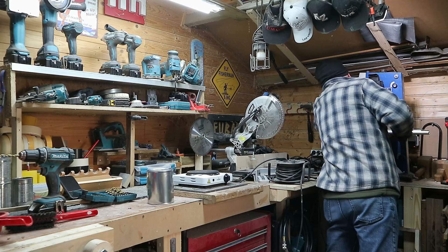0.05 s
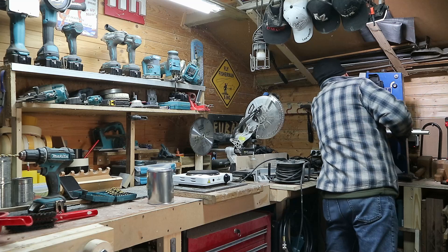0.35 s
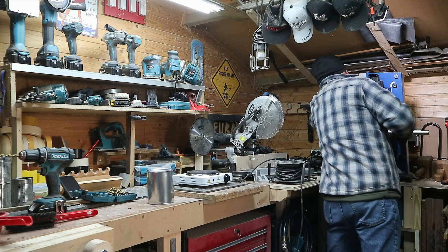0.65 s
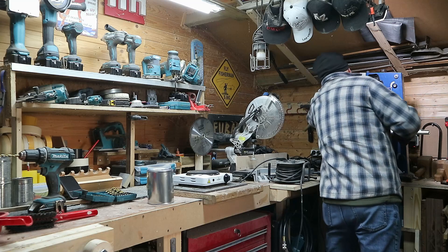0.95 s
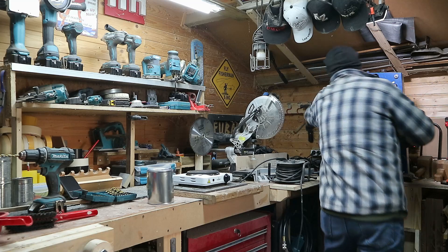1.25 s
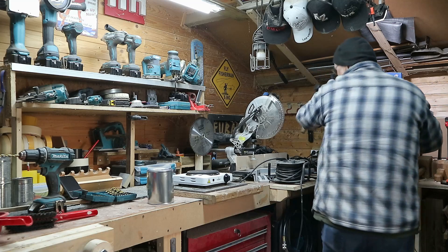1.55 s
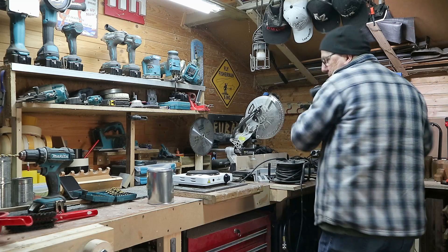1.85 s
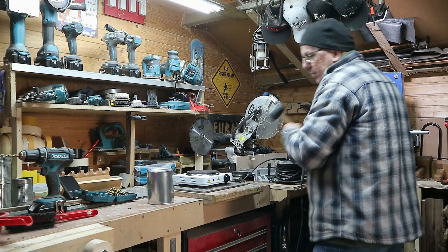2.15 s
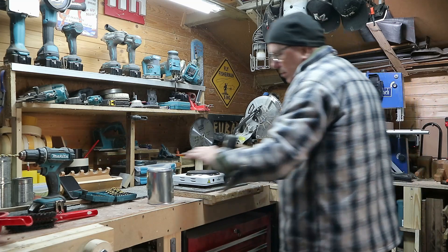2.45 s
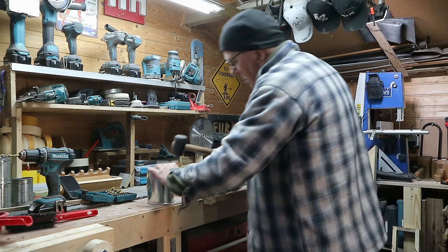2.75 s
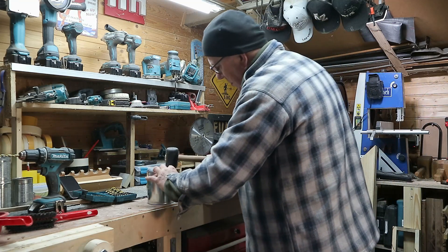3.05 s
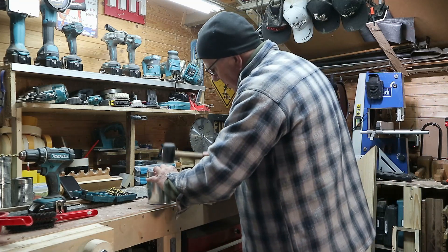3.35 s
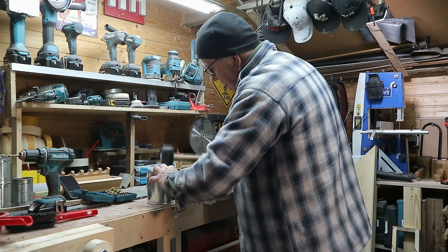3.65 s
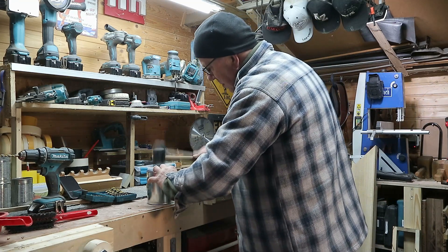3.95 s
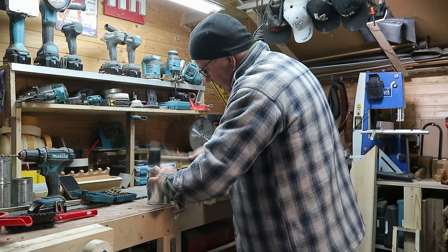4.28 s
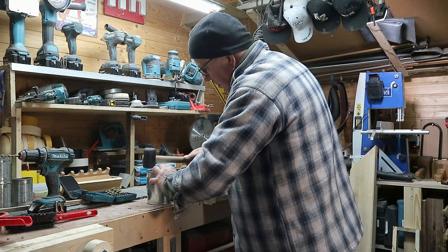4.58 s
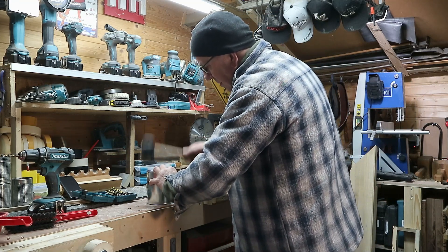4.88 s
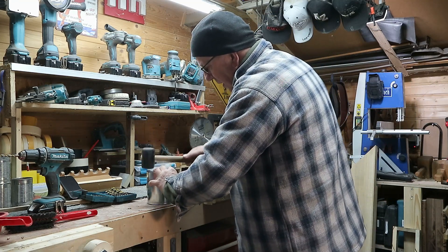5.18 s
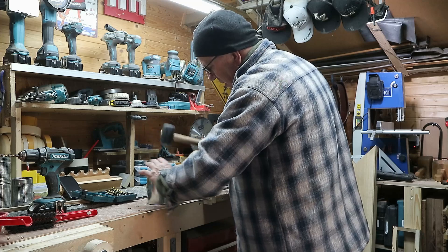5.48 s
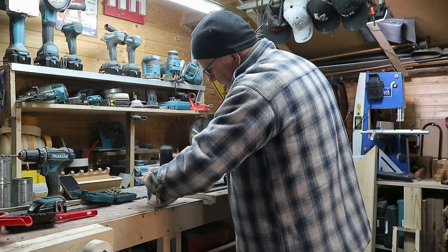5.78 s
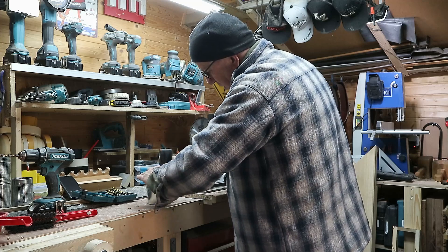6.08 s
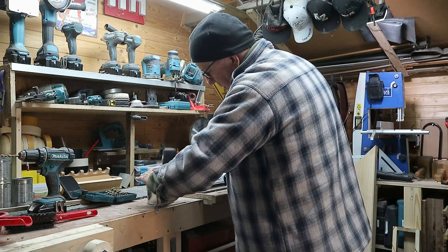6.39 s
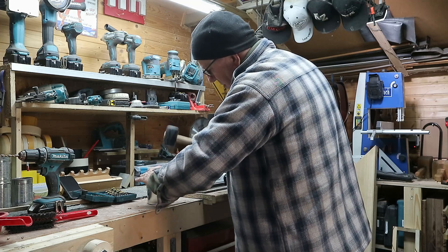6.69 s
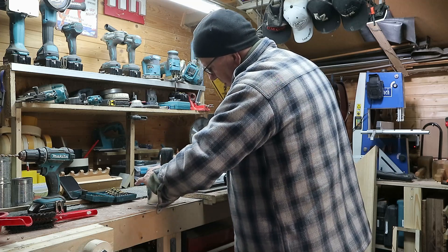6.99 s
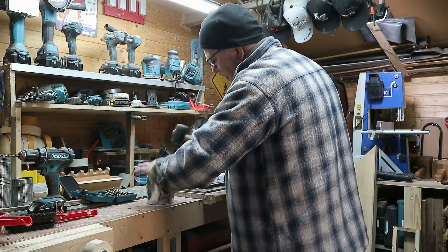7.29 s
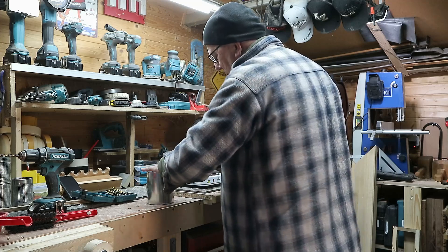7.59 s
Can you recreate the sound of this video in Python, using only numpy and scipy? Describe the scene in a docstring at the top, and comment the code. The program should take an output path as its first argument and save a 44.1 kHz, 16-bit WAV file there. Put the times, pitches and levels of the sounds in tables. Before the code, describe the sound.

In a small, cluttered workshop, tools knock together with a couple of sharp steel clanks and dull thuds. A jacket swishes briefly. A mallet then taps the lid of a sand-filled paint can and strikes it eleven times, in a quick run of seven and another of four. Each blow is a short tinny clack over a workbench thump, with a brief rattle. The echoes are tight, and the loudest peaks overload the microphone.

```python
"""Tools clank in a small, cluttered wooden workshop as someone takes a mallet and turns with a swish of
the jacket. Eleven quick blows, with a few light touches, drive home the lid of a sand-filled paint can.
Each impact excites the modes of the can and a bending wave in the bench. The sand damps the can heavily,
so a blow is a short tinny clack over a thump, with the crack of the rim and a brief rattle.
The room adds dense, short echoes, and the loudest peaks overload the microphone."""
import sys
import numpy as np
from scipy import signal
from scipy.fft import rfft, irfft
from scipy.io import wavfile

SR = 44100
rng = np.random.default_rng(int(sys.argv[2]) if len(sys.argv) > 2 else 0)


def store_wav(level_fs):
    """Save 16-bit WAV to argv[1]."""
    pcm = np.round(np.clip(np.atleast_2d(level_fs), -1, 1) * 32767)
    wavfile.write(sys.argv[1], SR, pcm.T.astype(np.int16))


N = 340893
TIME, EVENT_TIME = np.arange(N) / SR, np.arange(SR // 4) / SR   # time axes of the scene and one event, s

# spectra of the still air and of the low background noise: frequency_hz, density_db
AIR_SPECTRUM = [(25, -14), (50, -2.5), (80, 4), (170, 4.5), (370, 3.5), (700, -2), (1200, -12),
                (2800, -24.5), (5000, -29.5), (15000, -61.5)]
LOW_NOISE_SPECTRUM = [(25, -18.5), (55, -3.5), (75, 4.5), (110, -10.5), (800, -84.5)]
# the recorder turns the low background noise down once the blows begin: time_s, level_db
LOW_NOISE_GAIN = [(0, -61.5), (3.3, -61.5), (4.2, -77.5)]
# spectra of the room's echoes and of the hum of shelves and saw blades: frequency_hz, gain_db
ROOM_SPECTRUM = [(60, -4.5), (150, -2.5), (210, -1), (330, -1), (520, -4.5), (900, -2.5), (1500, -4),
                 (2500, -7), (5000, -8.5), (8000, -5), (13000, -12)]
HUM_SPECTRUM = [(100, -62), (200, -51), (400, -36), (700, -43), (1400, -52), (3000, -74)]
# reverberation time: frequency_hz, t60_s
ROOM_DECAY = [(100, .3), (250, .24), (700, .23), (2000, .215), (5000, .185), (12000, .16)]
# left-right likeness of the diffuse field: frequency_hz, correlation
COHERENCE = [(80, 1), (200, 0.12), (500, 0.36), (1000, 0), (2500, 0)]

# steady rustle of clothes: time_s, level_db
RUSTLE_ENVELOPE = [(0.0, -59.5), (0.7, -60), (1.27, -49.5), (1.72, -60.5), (2.38, -61), (2.93, -58.5),
                   (3.19, -67), (3.4, -70.5)]
# sleeve brushing the jacket: start_s, length_s, level_db, hollow_db
SLEEVE_STROKES = [(1.926, 0.094, -34.5, 3.5), (2.363, .013, -46.5, -22), (2.583, 0.2, -48.5, -22.5),
                  (2.734, 0.052, -38.5, -10.5), (2.869, .12, -37, -3.5), (7.281, .17, -60, -28)]
# spectra of sliding cloth and of its hollow resonance: frequency_hz, density_db
CLOTH_SPECTRUM = [(100, -18), (300, -3), (600, -2.5), (1100, -3), (2100, -4), (3000, -8), (5000, -9.5),
                  (9500, -22), (12000, -36), (15000, -59.5)]
HOLLOW_SPECTRUM = [(40, -60), (600, -26), (750, -10), (818, 4), (890, -9), (1050, -9), (1150, -1),
                   (1280, -14), (1500, -8), (1750, -19), (2140, -10), (2600, -22), (9000, -70)]

# tools knocking together: start_s, level_db, tilt_db_per_octave, pitch_hz
TOOL_KNOCKS = [(.092, -30, -2, 459), (0.16, -35.5, 3, 1074), (.222, -29.5, 3.5, 1913),
               (0.259, -39.5, -2, 360), (0.479, -32.5, -5, 549), (0.55, -35.5, -1, 1094),
               (.659, -45.5, -5, 416), (0.784, -16, -2, 422), (0.831, -12.5, 5.5, 2844),
               (1.05, -37, 1.5, 2330), (1.101, -1, 4.5, 1522), (1.105, -4, 3, 1690), (1.369, -19, 1, 830),
               (1.505, -37, 5.5, 2300), (1.646, -39, -1, 800)]
# modes of a struck steel tool and of a jogged hanging one: pitch_hz, level_db, t60_s
STEEL_MODES = [(592, -6, .17), (1739, -9, .16), (2318, 2, .21), (2370, -3, .13), (3165, -17, .18),
               (3962, -16, .11)]
HANGING_TOOL_MODES = [(921, -34.5, .55), (1206, -45, .6), (1416, -42, .6)]
# feet and things set down: start_s, level_db
FLOOR_THUDS = [(0.55, -49.5), (0.786, -23.5), (0.833, -34.5), (1.1, -33), (1.285, -46.5), (1.374, -43.5)]
# spectra of a knock and of a thud: frequency_hz, density_db
KNOCK_SPECTRUM = [(50, -14.5), (140, -12), (250, -3), (420, 2.5), (800, 1), (1200, -5.5), (1700, 0),
                  (2800, -10.5), (4300, -13), (7000, -25.5), (11000, -42.5), (15000, -51.5)]
THUD_SPECTRUM = [(40, -30), (92, -5), (135, -28.5), (190, -7), (260, -4), (450, -11), (3000, -85.5)]

# light touches: the mallet taps the lid, then the can is turned and let go: start_s, level_db
LIGHT_TOUCHES = [(3.097, -26.5), (5.699, -50.5), (5.834, -30), (7.648, -51)]
# spectra of shaken sand and tools and of the rim biting into its groove: frequency_hz, density_db
RATTLE_SPECTRUM = [(50, -27), (125, -19), (185, -2), (270, -2.5), (400, 1), (620, 5), (1000, 4),
                   (1900, -1.5), (2800, -17.5), (4200, -17), (6000, -29), (15000, -70)]
RIM_SPECTRUM = [(40, -20), (300, -14.5), (800, -1.5), (1200, 0.5), (2000, 3.5), (2800, -7), (4200, -8),
                (5500, -19.5), (8000, -24.5), (15000, -56)]
# mallet on the lid: start_s, force_db, spot (0 centre, 1 rim), sink (lid travel, 0 to 1),
# body_db, wall_db, lid_db, body_hz, wall_hz, lid_hz
MALLET_BLOWS = [(3.4155, -2, 0.87, .45, -1.5, -11.5, -21, 536, 750, 1685),
                (3.7519, -2, 0.62, 0.72, -0.5, -4, 0.5, 483, 854, 1850),
                (4.0806, -1.5, .3, 0.46, 3, 1, .5, 530, 736, 1524),
                (4.398, -3, 0.33, 0.56, 5.5, 2, -3, 537, 780, 1480),
                (4.6828, -4.5, .25, 0.47, 2.5, -1, -0.5, 516, 780, 1550),
                (5.0155, -4, .15, 0.37, 6.5, -4.5, -5.5, 512, 880, 1680),
                (5.277, -3.5, .03, .45, 4.5, -6.5, -0.5, 539.3, 880, 1660),
                (6.1371, 3, .95, 0.1, 0, -2, -12, 419, 860, 1664),
                (6.4851, -1, .55, 0.41, -2.5, -2.5, -2, 382, 760, 1900),
                (6.8708, -5, 0.72, .33, 1, 4, 1.5, 570, 844, 1915),
                (7.092, -3, 0.95, 0, -3, 1.5, -6.5, 542, 818, 1940)]
# response of each part, the stiff lid first and the heavy bench last: level_db, rise_s, delay_s
LID_RESPONSE = (0, .0007, .0008)
WALL_RESPONSE = (0, .0012, .0034)
BODY_RESPONSE = (0, .0012, .0042)
BENCH_RESPONSE = (-17.5, .0075, .005)
# glide of the bending wave: first_hz, last_hz
BENCH_GLIDE = (720, 170)
# a blow at the rim runs down the wall into the bench: centre_db, rim_db
BENCH_COUPLING = (-2, 7.5)
# weaker modes of can and bench top: pitch_hz, level_db, rise_s
WEAK_MODES = [(93, -43, .016), (183, -26.5, .012), (234, -28, .01), (365, -21, .007), (545, -22, .007),
              (885, -23, .004), (1250, -13, .002), (1452, -15, .0026), (2100, -10, .0007),
              (2700, -19, .0007), (3900, -20, .0009)]


def from_db(db):
    """Amplitude grows tenfold every 20 dB."""
    return 10 ** (np.asarray(db) / 20)


def unit_power(x):
    """Division by the RMS value gives unit power."""
    return x / np.sqrt(np.mean(x ** 2) + 1e-20)


def at_hz(points, hz):
    """Interpolation on a logarithmic frequency axis."""
    frequency_hz, value = np.transpose(points)
    return np.interp(np.log(np.maximum(hz, 1)), np.log(frequency_hz), value)


def add(track, start_s, sound):
    """Superposition: a sound adds to the track from start_s on."""
    start = max(int(start_s * SR), 0)
    track[..., start:start + sound.shape[-1]] += sound[..., :N - start]


def noise(spectrum, size=len(EVENT_TIME), tilt_db=0):
    """Random phases turn a spectrum, tilted by tilt_db per octave, into noise of unit power."""
    hz = np.fft.rfftfreq(size, 1 / SR)
    level_db = at_hz(spectrum, hz) + tilt_db * np.log2(np.maximum(hz, 200) / 1000)
    return unit_power(irfft(from_db(level_db) * np.exp(2j * np.pi * rng.random(len(hz))), size))


def diffuse(left, right):
    """A diffuse field is coherent in the bass and incoherent in the treble."""
    coherence = np.clip(at_hz(COHERENCE, np.fft.rfftfreq(len(left), 1 / SR)), -.99, .99)
    mid, side = rfft([left, right]) * np.sqrt([(1 + coherence) / 2, (1 - coherence) / 2])
    return irfft([mid + side, mid - side], len(left))


def place(x, pan_db, lag_s):
    """Level and arrival time give direction: the right channel is pan_db weaker and lag_s later."""
    return np.array([x * from_db(pan_db / 2), np.interp(TIME - lag_s, TIME, x) * from_db(-pan_db / 2)])


def swell(rise_s, delay_s=0):
    """Vibration spreads through a part, peaks at 1 twice rise_s after the delay, and is damped."""
    age = np.maximum(EVENT_TIME - delay_s, 0) / (2 * rise_s)
    return (age * np.exp(1 - age)) ** 2


def sine(hz):
    """Simple harmonic motion with a random phase."""
    return np.sin(2 * np.pi * (hz * EVENT_TIME + rng.random()))


def background():
    """Ambient noise: a diffuse field of quiet air, and low noise that the recorder turns down."""
    air = from_db(-61) * diffuse(noise(AIR_SPECTRUM, N), noise(AIR_SPECTRUM, N))
    low_noise = from_db(np.interp(TIME, *np.transpose(LOW_NOISE_GAIN))) * noise(LOW_NOISE_SPECTRUM, N)
    return air + low_noise


def reverberation(x, first_echo_s=.0019, build_s=.0041, hum_t60_s=2.3):
    """Echoes scattered by the clutter decay exponentially band by band; a resonant hum outlasts them."""
    t, hz = np.arange(SR) / SR, np.fft.rfftfreq(SR, 1 / SR)
    edges_hz = np.geomspace(30, 18000, 15)
    white, echoes = rfft(rng.standard_normal((2, SR))), 0
    onset = 1 - np.exp(-np.maximum(t - first_echo_s, 0) / build_s)
    coloured = white * from_db(at_hz(ROOM_SPECTRUM, hz))
    for low, high in zip(edges_hz, edges_hz[1:]):
        fade = unit_power(onset * from_db(-60 * t / at_hz(ROOM_DECAY, np.sqrt(low * high))))
        echoes = echoes + irfft(coloured * ((hz >= low) & (hz < high)), SR) * fade
    hum_fade = unit_power(onset * from_db(-60 * t / hum_t60_s))
    hum = irfft(white * from_db(at_hz(HUM_SPECTRUM, hz)), SR) * hum_fade
    return signal.fftconvolve(x[None], diffuse(*(echoes + hum)) / np.sqrt(SR), axes=1)


def shifting_echoes(x):
    """Reflection paths change as the person moves, so each blow meets another impulse response."""
    out, starts = np.zeros((2, N)), [0] + [blow[0] for blow in MALLET_BLOWS]
    for start_s, end_s in zip(starts, starts[1:] + [N / SR]):
        add(out, start_s, reverberation(x[int(start_s * SR):int(end_s * SR)]))
    return out


def jacket(grip_s=.0096, release_s=.0086, rustle_gain_db=4):
    """Sliding friction of cloth makes short swishes, over a rustle that drops as the person stills."""
    rustle_db = np.interp(TIME, *np.transpose(RUSTLE_ENVELOPE), right=-74) + rustle_gain_db
    out = from_db(rustle_db) * noise(CLOTH_SPECTRUM, N)
    for start_s, length_s, level_db, hollow_db in SLEEVE_STROKES:
        grip = 1 - np.exp(-EVENT_TIME / grip_s)
        release = np.exp(-np.maximum(EVENT_TIME - length_s, 0) / release_s)
        friction = noise(CLOTH_SPECTRUM) + from_db(hollow_db) * noise(HOLLOW_SPECTRUM)
        add(out, start_s, from_db(level_db) * grip * release * friction)
    return out


def tools(contact_s=.0026, firm_fade_s=.0069, note_db=-5, ring_db=-20.5, jog_s=.835):
    """Impacts of wood and steel excite free vibration; a jogged tool sings on, and the floor thuds."""
    out, onset = np.zeros(N), 1 - np.exp(-EVENT_TIME / contact_s)
    for start_s, level_db, tilt_db, pitch_hz in TOOL_KNOCKS:
        fade_s = firm_fade_s * 2 ** (-level_db / 25)   # a knock 25 dB lighter lasts twice as long
        note = from_db(note_db) * np.sin(2 * np.pi * pitch_hz * EVENT_TIME)
        clatter = (noise(KNOCK_SPECTRUM, tilt_db=tilt_db) + note) * np.exp(-EVENT_TIME / fade_s)
        # bright knocks wake the high modes of the steel, dull ones the low
        ring = sum(from_db(db + 1.3 * tilt_db * np.log2(hz / 1500) - 60 * EVENT_TIME / t60_s) * sine(hz)
                   for hz, db, t60_s in STEEL_MODES)
        add(out, start_s, from_db(level_db) * (clatter + from_db(ring_db) * ring) * onset)
    for pitch_hz, level_db, t60_s in HANGING_TOOL_MODES:
        add(out, jog_s, from_db(level_db - 60 * TIME / t60_s) * np.sin(2 * np.pi * pitch_hz * TIME))
    for start_s, level_db in FLOOR_THUDS:
        add(out, start_s, from_db(level_db) * swell(rise_s=.011) * noise(THUD_SPECTRUM))
    return out


def bending_wave(glide_s=.0115, round_trip_s=.021, round_trip_db=-9.5):
    """Dispersion: short waves outrun long ones, so the bench's thump sinks; the far end reflects it."""
    first_hz, last_hz = BENCH_GLIDE
    level_db, rise_s, delay_s = BENCH_RESPONSE
    out = 0
    for trip in range(3):
        start_s = delay_s + trip * round_trip_s
        hz = last_hz + (first_hz - last_hz) * np.exp(-np.maximum(EVENT_TIME - start_s, 0) / glide_s)
        wave = np.sin(2 * np.pi * (np.cumsum(hz) / SR + rng.random()))
        out = out + from_db(level_db + trip * round_trip_db) * swell(rise_s, start_s) * wave
    return out


def light_touches(rise_s=.003, fade_s=.017, bench_db=7):
    """Light contact, a mallet tap or a move of the can, excites brief noise and a soft bending wave."""
    out, envelope = np.zeros(N), (1 - np.exp(-EVENT_TIME / rise_s)) * np.exp(-EVENT_TIME / fade_s)
    for start_s, level_db in LIGHT_TOUCHES:
        contact = envelope * noise(RATTLE_SPECTRUM, tilt_db=2.5)
        add(out, start_s, from_db(level_db) * (contact + from_db(bench_db) * bending_wave()))
    return out


def rattle(level_db=-9, rise_s=.0027, fade_s=.031, spot_db=6, grain_db=3, grain_s=.0014):
    """Forced vibration shakes the sand and loose tools briefly, most after a blow near the rim."""
    out, shake = np.zeros((2, N)), (1 - np.exp(-EVENT_TIME / rise_s)) * np.exp(-EVENT_TIME / fade_s)
    grain_starts = np.arange(0, EVENT_TIME[-1], grain_s)
    for start_s, force_db, spot, *_ in MALLET_BLOWS:
        grit = diffuse(noise(RATTLE_SPECTRUM), noise(RATTLE_SPECTRUM))
        flicker_db = grain_db * np.interp(EVENT_TIME, grain_starts, rng.normal(size=len(grain_starts)))
        gain = from_db(force_db + level_db + spot_db * (spot - .5) + flicker_db)
        add(out, start_s, gain * shake * grit)
    return out


def rim_crack(level_db=-10, rise_s=.0014, sink_db=8, sink_stretch=.98):
    """Friction of the rim in its groove makes a noise burst, louder and longer the further it sinks."""
    out = np.zeros((2, N))
    for start_s, force_db, _, sink, *_ in MALLET_BLOWS:
        crunch = diffuse(noise(RIM_SPECTRUM), noise(RIM_SPECTRUM))
        envelope = swell(rise_s * (1 + sink_stretch * sink))
        add(out, start_s, from_db(force_db + level_db + sink_db * sink) * envelope * crunch)
    return out


def mode(hz, level_db, rise_s, delay_s=0, push=0):
    """A heavily damped mode swells after its delay; an added share (push) starts at the contact."""
    return from_db(level_db) * (swell(rise_s, delay_s) + push * swell(rise_s)) * sine(hz)


def mallet(scatter_db=4, detune=.035, push=.083, bench_below_hz=400):
    """Modal excitation depends on the point of impact, so each blow has its own strengths and pitches."""
    out = np.zeros(N)
    for start_s, force_db, spot, _, body_db, wall_db, lid_db, body_hz, wall_hz, lid_hz in MALLET_BLOWS:
        body = from_db(body_db) * mode(body_hz, *BODY_RESPONSE, push)
        wall = from_db(wall_db) * mode(wall_hz, *WALL_RESPONSE, push)
        lid = from_db(lid_db) * mode(lid_hz, *LID_RESPONSE)
        bench_db = np.interp(spot, (0, 1), BENCH_COUPLING)
        blow = body + wall + lid + from_db(bench_db) * bending_wave()
        colour = [(300, bench_db), (body_hz, body_db), (wall_hz, wall_db), (lid_hz, lid_db)]
        for hz, level_db, rise_s in WEAK_MODES:
            pitch_hz = hz * (1 + detune * (hz > bench_below_hz) * rng.normal())   # bench modes hold pitch
            blow += mode(pitch_hz, level_db + at_hz(colour, hz) + scatter_db * rng.normal(), rise_s)
        add(out, start_s, from_db(force_db) * blow)
    return out


def scene(crack_pan_db=5.5):
    """Direct and reverberant fields add; the can is left of centre, the person and tools to the right."""
    can = mallet() + light_touches()
    crack = rim_crack()
    handling = tools() + jacket()
    direct = place(can, pan_db=1.2, lag_s=.00009) + rattle()
    direct += crack * from_db([[crack_pan_db / 2], [-crack_pan_db / 2]])
    direct += from_db(-3) * place(handling, pan_db=-3, lag_s=-.00008)
    to_room = from_db(-3.5) * can + from_db(-3) * crack[0] + handling
    return direct + shifting_echoes(to_room) + background()


def record(dry, threshold_db=-2, release_db_per_s=40, attack_s=.033, stopband_hz=15800):
    """Slow 2:1 compression ducks after loud blows but lets their first peaks clip; the top is cut."""
    over_db = np.maximum(20 * np.log10(np.abs(dry).max(axis=0) + 1e-9) - threshold_db, 0)
    held_db = np.maximum.accumulate(over_db + release_db_per_s * TIME) - release_db_per_s * TIME
    pole = np.exp(-1 / (attack_s * SR))
    ducked = dry * from_db(-.5 * signal.lfilter([1 - pole], [1, -pole], held_db))
    lowpass = signal.cheby2(12, 60, stopband_hz, fs=SR, output="sos")
    return signal.sosfilt(lowpass, np.clip(ducked, -1, 1))


dry = scene()
out = record(dry)
store_wav(out)
```